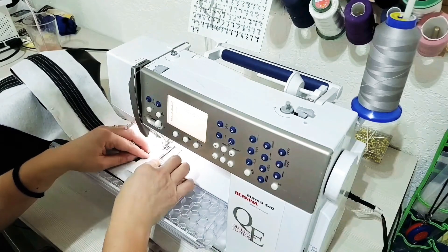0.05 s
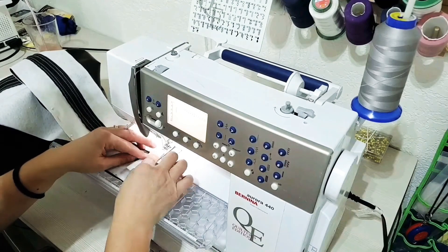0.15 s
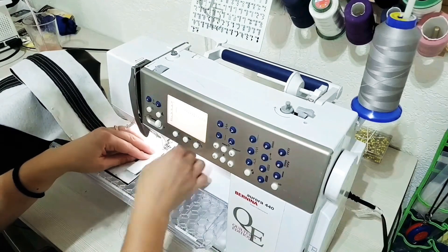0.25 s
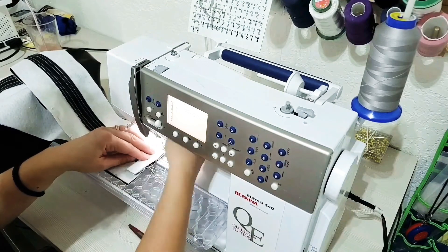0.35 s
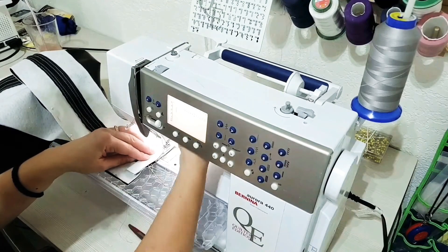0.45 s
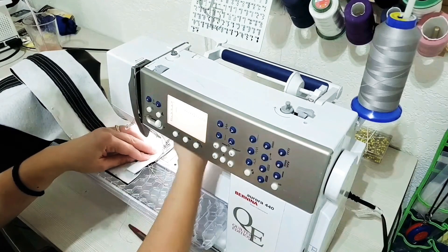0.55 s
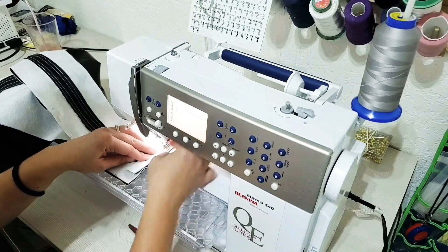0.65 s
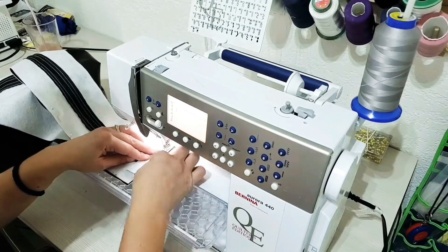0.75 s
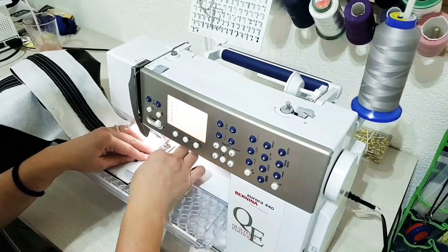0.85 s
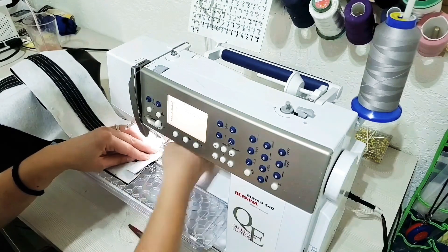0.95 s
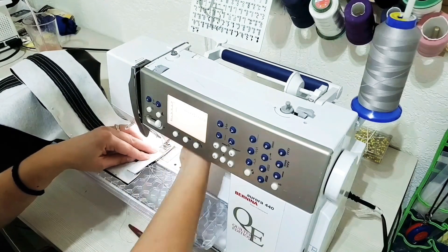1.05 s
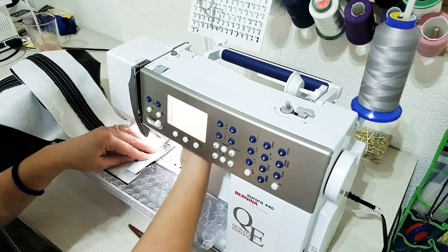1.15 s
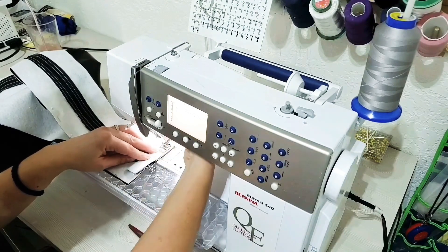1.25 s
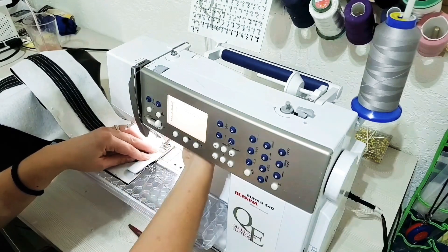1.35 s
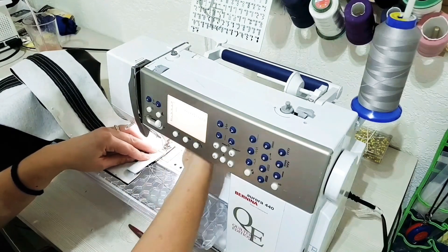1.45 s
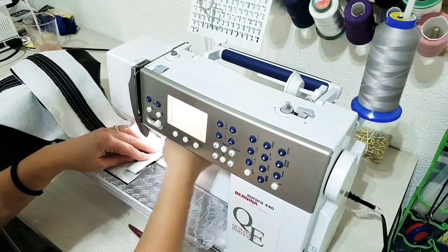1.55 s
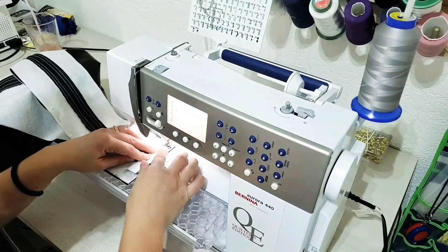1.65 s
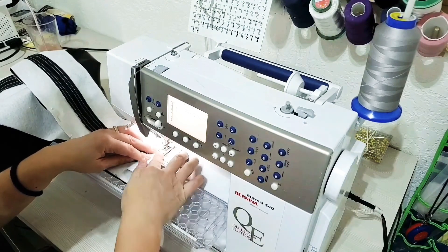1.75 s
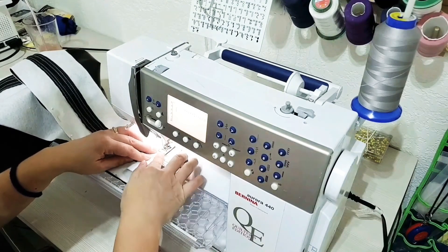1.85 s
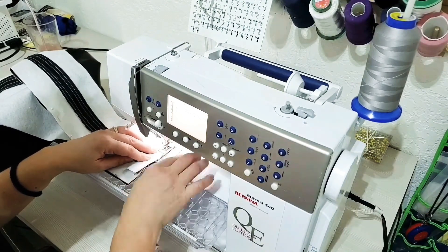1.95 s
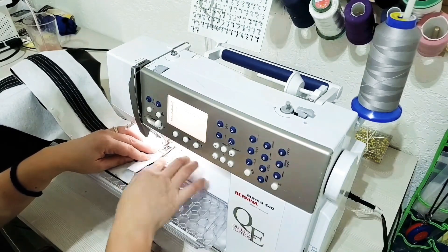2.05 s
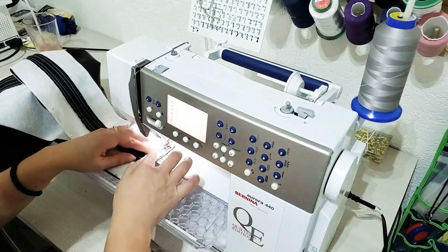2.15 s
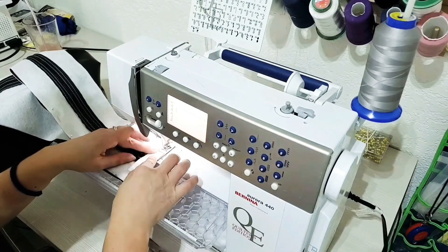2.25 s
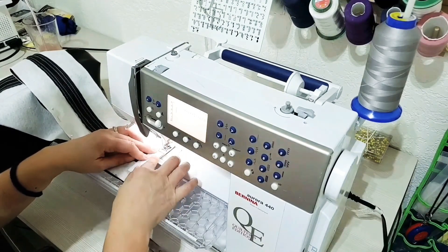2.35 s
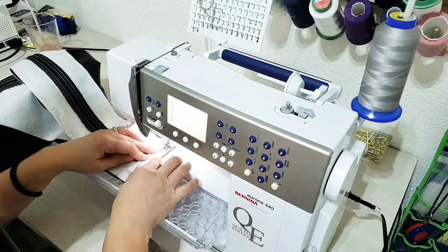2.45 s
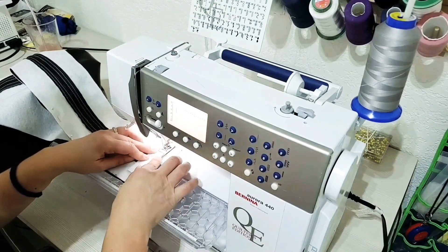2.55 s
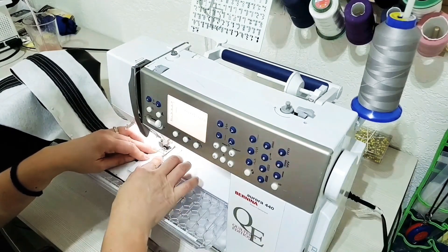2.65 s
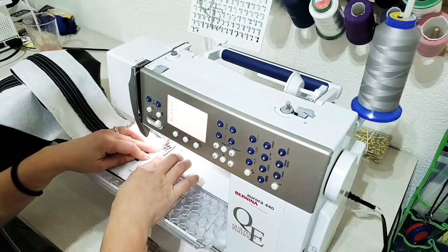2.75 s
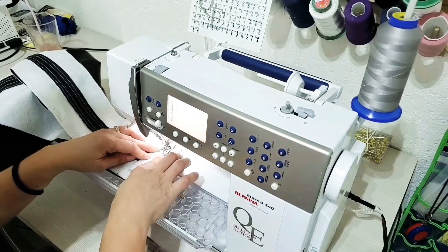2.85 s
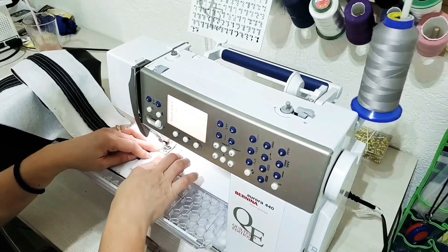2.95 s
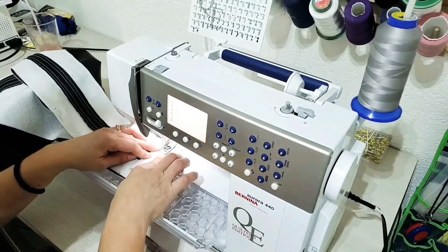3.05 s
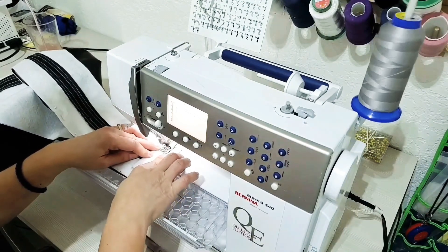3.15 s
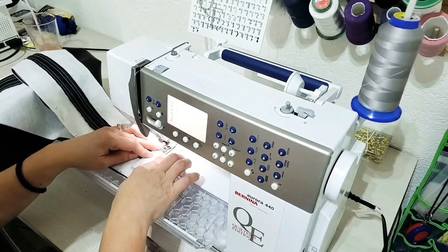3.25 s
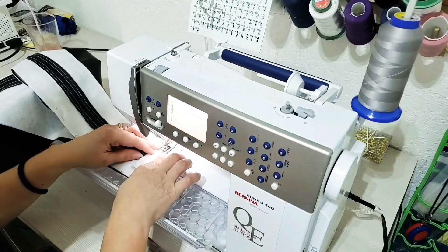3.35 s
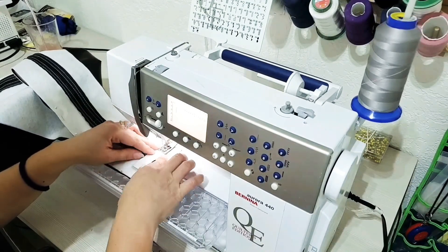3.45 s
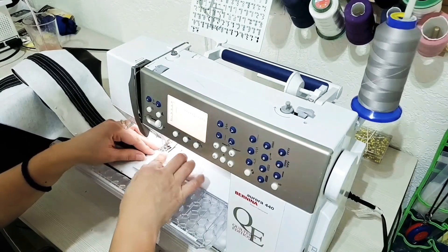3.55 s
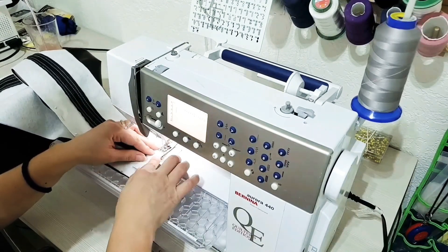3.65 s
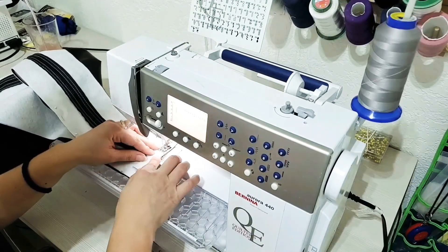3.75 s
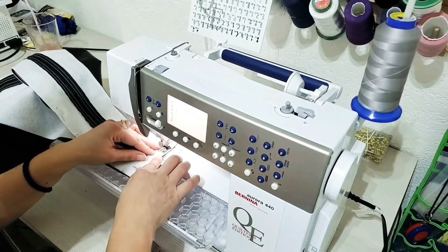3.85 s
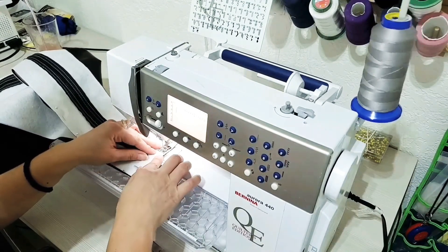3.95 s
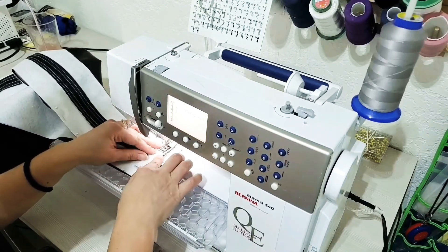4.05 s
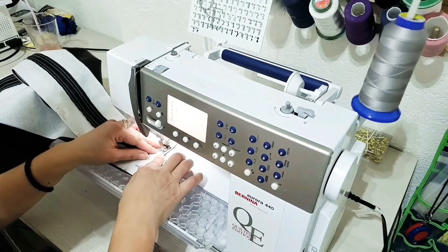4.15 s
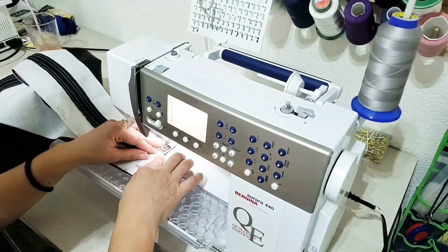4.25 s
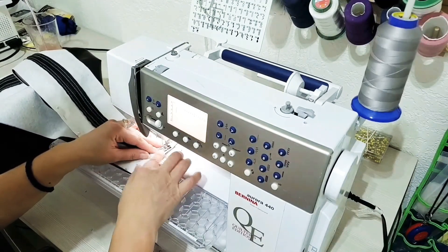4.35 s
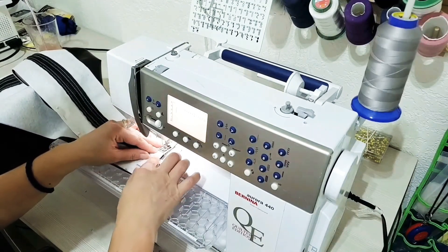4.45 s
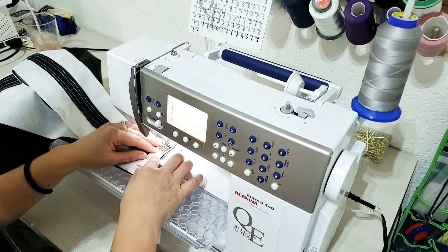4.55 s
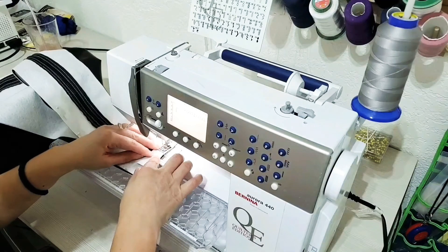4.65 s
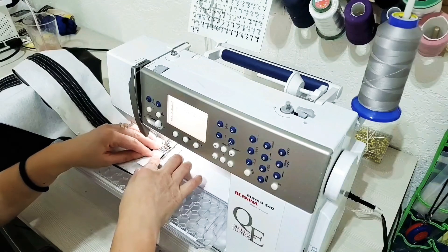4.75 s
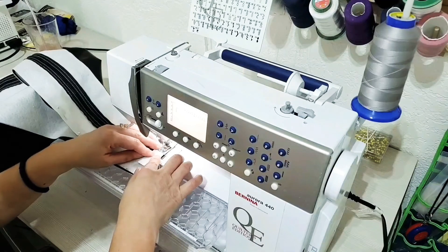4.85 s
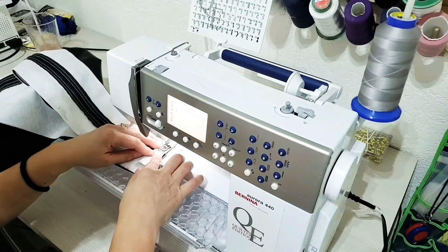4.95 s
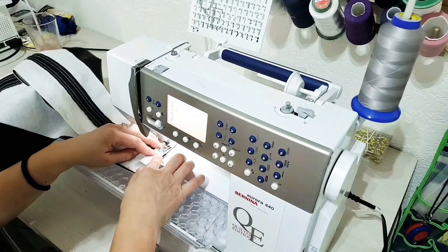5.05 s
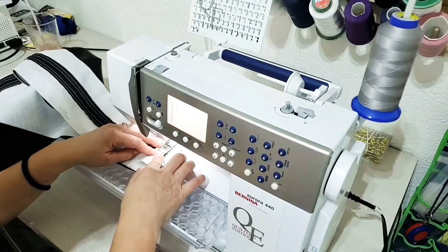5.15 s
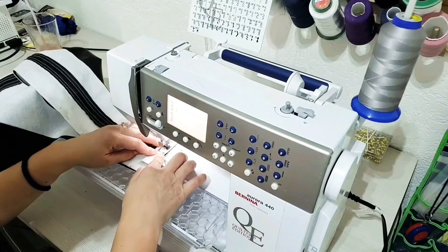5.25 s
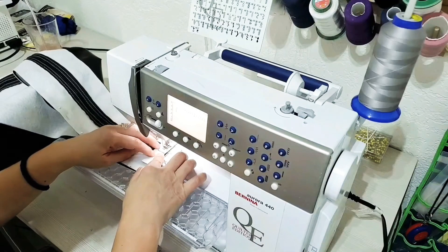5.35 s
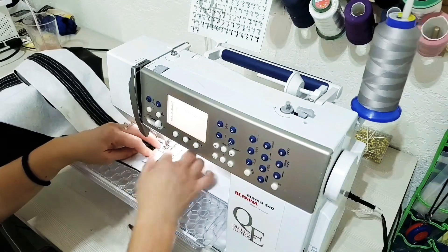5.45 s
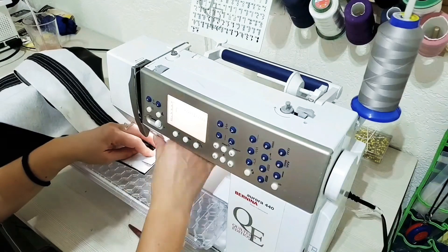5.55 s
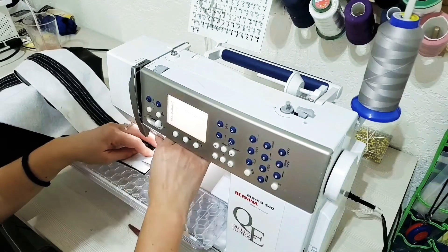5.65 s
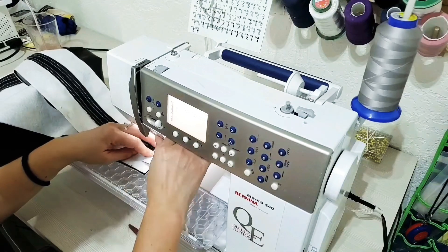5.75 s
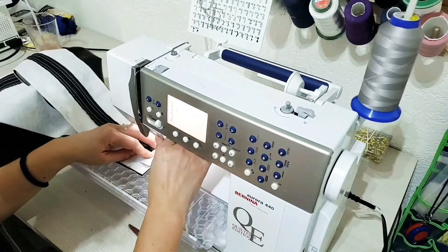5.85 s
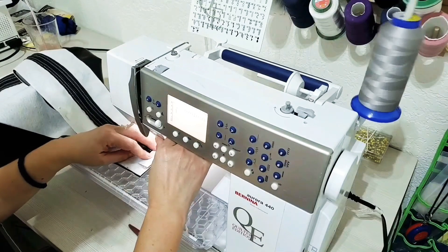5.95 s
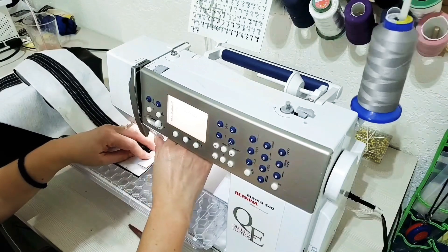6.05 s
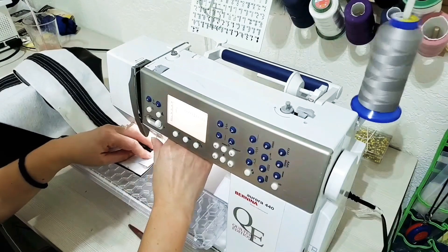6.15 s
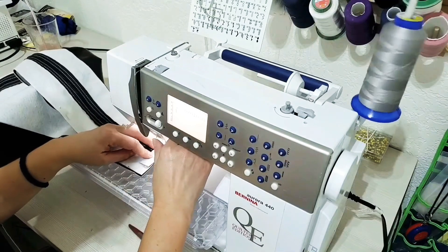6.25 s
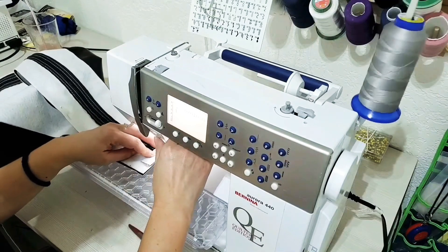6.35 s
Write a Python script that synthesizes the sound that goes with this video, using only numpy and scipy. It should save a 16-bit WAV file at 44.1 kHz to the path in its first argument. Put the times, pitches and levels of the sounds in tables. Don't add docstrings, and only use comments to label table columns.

```python
import sys
import numpy as np
from scipy import signal
from scipy.fft import rfft, irfft, next_fast_len
from scipy.io import wavfile
from scipy.ndimage import uniform_filter1d

SR = 44100
rng = np.random.default_rng(int(sys.argv[2]) if len(sys.argv) > 2 else 0)


def boost(x):
    u = np.asarray(x, float) / 20
    return 10 ** u


def dump(signal):
    limited = np.clip(np.atleast_2d(signal).T, -1, 1)
    pcm = np.round(limited * 32767).astype(np.int16)
    wavfile.write(sys.argv[1], SR, pcm)


N = 282007
M = next_fast_len(N + 8192)
T = np.arange(N) / SR
EDGE_HZ = 14750
SIDES = np.array([[0.5], [-0.5]])


def evened(x):
    return x / np.sqrt(np.mean(x ** 2) + 1e-20)


def wander(samples):
    smooth = uniform_filter1d(rng.standard_normal(N), samples)
    return evened(uniform_filter1d(smooth, samples))


def read(points, hz):
    f, value = np.transpose(points)
    return np.interp(np.log(hz + 1), np.log(f + 1), value)


def colour(points, peaks):
    hz = np.fft.rfftfreq(M, 1 / SR)
    level_db = read(points, hz) - np.clip((hz - EDGE_HZ) / 6, 0, 90)
    for centre_hz, width_hz, peak_db in peaks:
        level_db += peak_db / (1 + (2 * (hz - centre_hz) / width_hz) ** 2)
    return hz, boost(level_db)


def causal(gain):
    folded = irfft(np.log(gain + 1e-5), M)
    folded[1:M // 2] *= 2
    folded[M // 2 + 1:] = 0
    return np.exp(rfft(folded))


def swell(start_s, rise_s, t60_s):
    rise_s, t60_s = np.clip(rise_s, 0.0005, 0.06), np.clip(t60_s, 0.02, 0.5)
    u = np.arange(int(0.5 * SR)) / SR
    rise = np.sin(np.pi / 2 * np.minimum(u / rise_s, 1)) ** 2
    decay = boost(-60 * np.maximum(u - rise_s, 0) / t60_s)
    return round(start_s * SR), rise * decay


def add(mix, at, sound):
    part = mix[..., at:at + sound.shape[-1]]
    part += sound[..., :part.shape[-1]]


def motor_runs():
    # time_s, load_db
    loads = [
        [(2.42, -52), (2.53, -10.5), (2.575, -29), (2.63, -3.5), (2.72, -5.5), (2.93, -6), (3.14, -5.5),
         (3.29, -15.5), (3.37, -63)],
        [(3.64, -38), (3.754, -3.5), (3.866, 3), (4.052, -1.5), (4.222, -7), (4.32, -45)],
        [(4.67, -37.5), (4.71, -27), (4.79, -1.5), (4.9, -1.5), (5.0, -3.5), (5.24, -9.5), (5.37, -21),
         (5.45, -49)],
        [(5.55, -45), (5.65, -8.5), (5.7, 4), (5.85, 0), (5.92, 0), (6.16, 1), (6.236, 0), (6.27, 3.5),
         (6.39, -6)],
    ]
    # level_db at load 0, slope_db per dB of load, lag_s
    layers = [(-48.5, .6, -0.0047), (-40.5, 1.04, -0.003), (-47.5, 1.19, 0.01), (-54.5, 1.25, 0.024)]
    drive = np.zeros((4, N))
    for rows in loads:
        time_s, load_db = np.transpose(rows)
        on = (T > time_s[0]) & (T < time_s[-1])
        for k, (level_db, slope_db, lag_s) in enumerate(layers):
            drive[k] += on * boost(level_db + slope_db * np.interp(T - lag_s, time_s, load_db))
    return drive


def blows(table, parts_db, rises_s):
    soft_dull = 0.2
    drive = np.zeros((4, N))
    for start_s, level_db, hard_db, t60_s in table:
        echo = boost(-15) * swell(start_s, 0.02, 0.16)[1]
        for k, (part_db, rise_s) in enumerate(zip(parts_db, rises_s)):
            at, shape = swell(start_s - 0.6 * rise_s, rise_s, t60_s)
            gain_db = level_db + part_db + hard_db * (k - 1)
            if k == 2:
                gain_db += soft_dull * min(hard_db, 0)
            add(drive[k + 1], at, boost(gain_db) * (shape + echo))
    return drive


def lever_blows():
    # start_s, level_db, hardness_db per band, t60_s
    lever_hits = [
        (0.278, -61.5, -14.5, .1),
        (.29, -50, -6, 0.39),
        (0.314, -39.5, 3, 0.23),
        (0.384, -39.5, -4.5, 0.23),
        (1.164, -61, -9, 0.2),
        (1.341, -41, -0.5, 0.31),
        (1.36, -39.5, 4.5, 0.064),
        (1.32, -66, 0, .05),
        (1.447, -60, -12, 0.15),
        (1.48, -70, -8, .5),
    ]
    return blows(lever_hits, [-4.5, -8.5, -12.5], [0.01, 0.018, 0.003])


def fabric_shifts():
    # start_s, level_db, hardness_db per band, t60_s
    shifts = [
        (0.512, -65, -9, 0.3),
        (.774, -57.5, -8, .13),
        (.79, -53, -6, .16),
        (.81, -60, 4, .3),
    ]
    return blows(shifts, [-8, -9, -24], [0.013, 0.026, 0.015])


def stitch_blows():
    # start_s, level_db, hardness_db per band, t60_s
    stitch_hits = [(2.479, -80, -19, .3), (2.499, -52.5, -4, 0.1), (2.557, -41, -2, 0.59),
                   (2.645, -48, -6, .05), (2.745, -46, -5, .06), (3.082, -47, -7, .05), (3.231, -50, 5, .05),
                   (3.765, -50, -4, .08), (3.818, -50, 0, .06), (4.15, -58, 12, .5), (4.07, -50, 3, .08),
                   (2.674, -38, -2, 0.095), (2.794, -40, -3, 0.2), (2.844, -42.5, 5, 0.21),
                   (2.895, -41, 12, 0.13), (2.964, -50, -4, 0.16), (3.032, -36.5, 5, 0.05),
                   (3.102, -40.5, -1.5, 0.33), (3.188, -44.5, -4, 0.35), (3.247, -44.5, 0, 0.16),
                   (3.702, -68, -27.5, 0.17), (3.712, -60, 7, .36), (3.848, -43, 0, 0.076),
                   (3.898, -47.5, 14.5, 0.063), (3.948, -45, 14, 0.079), (3.985, -39, -1, 0.043),
                   (4.128, -39.5, -13.5, 0.092), (4.215, -60, -3, .1), (4.34, -78, 14, 0.61),
                   (4.708, -63, -19.5, 0.3), (4.735, -60, -2, 0.3), (4.775, -50, -8, .1),
                 (4.79, -45.5, 13, 0.12), (4.816, -36, 1, 0.065), (4.875, -36, 0.5, 0.083),
                 (4.947, -50, -2, .04), (5.282, -52, 8, .05), (5.3, -45, -3, .05), (5.822, -41, 3, .06),
                 (5.985, -43, 6, .05), (6.066, -44, 0, .06), (6.1, -44, 8, .06), (6.166, -48, 8, .04),
                 (6.247, -54, 9, .06), (6.382, -48, 2, .05), (5.73, -45, 0, .05), (5.63, -58, 8, .05),
                 (5.016, -40.5, -2.5, 0.2), (5.071, -40, -7.5, 0.18), (5.134, -47, 10.5, 0.15),
                 (5.248, -43.5, -7, 0.75), (5.319, -33.5, 2.5, 0.12), (5.592, -64.5, -15, 0.53),
                 (5.647, -46.5, -7.5, 0.041), (5.665, -35.5, 10, 0.12), (5.779, -43, -3, 0.029),
                 (5.862, -44, 3, .05), (5.949, -45, -3, 0.034), (6.011, -35, -5, 0.27),
                 (6.132, -40.5, 2, 0.03), (6.183, -49, 8, 0.049), (6.224, -46, 2, 0.033),
                 (6.314, -43, 5, 0.024), (6.348, -49.5, -17.5, 0.39)]
    return blows(stitch_hits, [-6, -7, -11], [0.031, 0.028, 0.005])


def machine():
    # freq_hz, level_db per Hz
    casing = [(18, -64), (30, 0.5), (117, 3.5), (182, -7.5), (410, -12.5), (1230, -11), (1470, -14.5),
              (1870, -17.5), (2020, -15.5), (2830, -10), (5890, -19), (10700, -17.5), (14000, -19.5),
              (15500, -46)]
    # centre_hz, width_hz, peak_db over the casing colour
    modes = [(87, 20, -2.5), (113.8, 51, 3), (307, 34, 7), (416, 25, 8), (520, 32, 5.5), (659, 230, 7),
             (960, 14, 4), (1180, 13, 4), (1287, 31, 5), (1660, 95, 4), (1864, 60, 11), (2135, 30, 5),
             (2840, 13, 7.5), (3400, 41, 4.5), (4015, 290, 4.5), (11000, 220, 4.5)]
    band_hz = [48, 250, 1500, 5500, 16000]
    drive = motor_runs() + lever_blows() + fabric_shifts() + stitch_blows()
    size = boost(1.47 * wander(120))
    contacts = evened(size * rng.standard_normal((2, N)))
    hz, gain = colour(casing, modes)
    phase = np.exp(1j * np.angle(causal(gain)))
    sound = 0
    for k in range(4):
        low_cut = 1 + (band_hz[k] / (hz + 1)) ** 8
        high_cut = 1 + (hz / band_hz[k + 1]) ** 8
        band = gain / np.sqrt(low_cut * high_cut)
        sound = sound + rfft(drive[k] * contacts, M) * evened(band) * phase
    alike = 1 / (1 + (hz / 750) ** 4)
    low = irfft(sound[0] * np.sqrt(alike), M)[:N]
    high = irfft(sound * np.sqrt(1 - alike), M)[:, :N]
    return low, high


def rings(table, wobble, rise, lag):
    out = np.zeros((2, N))
    for start_s, level_db, pitch_hz, t60_s in table:
        at, shape = swell(start_s, rise, t60_s)
        drift = evened(uniform_filter1d(rng.standard_normal(len(shape)), 300))
        turn = 2 * np.pi * np.cumsum(pitch_hz * (1 + wobble * drift)) / SR
        lean = boost(level_db + 0.3 * SIDES)
        add(out, at, lean * shape * np.sin(turn + lag * SIDES))
    return out


def panel_rings():
    # start_s, level_db, pitch_hz, t60_s
    struck = [(.283, -35, 520, .056), (.318, -30, 396, .064), (2.829, -31.5, 462.4, 0.25),
              (3.11, -19.5, 557, 0.07), (3.129, -30, 898, 0.1), (4.125, -27, 980, 0.16),
              (4.127, -16, 550, 0.075), (4.815, -31, 850, 0.19), (5.966, -27, 658, 0.091),
              (6.011, -12.5, 655, 0.11), (6.01, -26, 520, .05), (6.014, -23, 960, 0.078),
              (6.012, -23, 1100, .09)]
    # start_s, level_db, pitch_hz, t60_s
    held = [(.43, -43.5, 266.4, 0.38), (2.97, -37, 292.5, 0.13), (3.69, -38, 724, 0.088),
            (3.82, -40, 714, 0.13), (4.81, -40, 1097, 0.11), (6.25, -36, 604, .15),
            (2.495, -38.5, 410, .23), (2.575, -32, 420, 0.2), (2.855, -36, 486, 0.32),
            (3.155, -33.5, 646, 0.18), (3.21, -44, 307, 0.24), (4.79, -30, 664, 0.11),
            (4.95, -33.5, 416.6, 0.43), (4.96, -36, 653, 0.55), (5.08, -36, 222.3, 0.19),
            (5.178, -40, 310, .1), (5.21, -30, 311.5, .1), (3.84, -31, 485, .15), (3.7, -35, 410, .4),
            (2.6, -36, 500, .2), (5.76, -30, 300, .15), (5.77, -31, 700, .1), (5.91, -31, 640, .12),
            (5.095, -32, 530, .1), (2.545, -34, 700, .15), (5.375, -48.5, 720, .15),
            (5.305, -41.5, 674, 0.22)]
    # start_s, level_db, pitch_hz, t60_s
    take_up = [
        (2.452, -48, 523, .24),
        (2.476, -45, 525, 0.3),
        (3.665, -48, 520, 0.083),
        (3.68, -40, 510, 0.15),
        (5.568, -52, 537, .13),
        (5.585, -43, 536, 0.32),
    ]
    # start_s, level_db, pitch_hz, t60_s
    strokes = [
        (3.99, -35.0, 432.0, 0.14),
        (4.81, -33.0, 1259.0, 0.09),
        (6.099, -35.0, 303.0, 0.09),
        (6.128, -30.0, 1185.0, 0.06),
        (6.205, -34.0, 524.0, 0.14),
        (6.245, -39.0, 1222.0, 0.19),
    ]
    return (boost(-3.2) * rings(struck, wobble=0.018, rise=0.008, lag=-0.45)
            + boost(-3.0) * rings(held, wobble=0.018, rise=0.023, lag=0.7)
            + rings(take_up, wobble=0.045, rise=0.022, lag=-1.0)
            + rings(strokes, wobble=0.025, rise=0.016, lag=0.3))


def far_and_side_rings():
    # start_s, level_db, pitch_hz, t60_s
    opposed = [(0.382, -31.0, 285.0, 0.06), (2.636, -36.0, 680.0, 0.07), (2.769, -38.0, 413.0, 0.23),
               (2.887, -36.0, 662.0, 0.08), (2.932, -32.0, 423.0, 0.24), (2.986, -35.0, 404.0, 0.08),
               (3.125, -37.0, 331.0, 0.09), (3.785, -32.0, 698.0, 0.11), (3.835, -34.0, 1121.0, 0.08),
               (3.965, -36.0, 1204.0, 0.15), (3.973, -34.0, 266.0, 0.22), (4.781, -33.0, 303.0, 0.08),
               (4.829, -36.0, 496.0, 0.09), (4.875, -36.0, 1102.0, 0.13), (5.003, -37.0, 1323.0, 0.09),
               (5.09, -37.0, 919.0, 0.07), (5.676, -33.0, 514.0, 0.11), (5.682, -33.0, 662.0, 0.12),
               (5.926, -33.0, 1277.0, 0.15), (5.945, -36.0, 1112.0, 0.15), (6.007, -30.0, 1259.0, 0.07),
               (6.007, -30.0, 1589.0, 0.09), (6.244, -35.0, 413.0, 0.11), (6.287, -38.0, 230.0, 0.1),
               (6.299, -34.0, 478.0, 0.16)]
    # start_s, level_db, pitch_hz, t60_s
    sideways = [(2.659, -33.0, 478.0, 0.27), (3.189, -34.0, 312.0, 0.22), (3.864, -36.0, 845.0, 0.1),
                (3.928, -36.0, 606.0, 0.08), (4.898, -36.0, 230.0, 0.2), (5.713, -33.0, 1093.0, 0.08),
                (6.126, -37.0, 1599.0, 0.07), (6.128, -32.0, 910.0, 0.06), (6.264, -35.0, 974.0, 0.09),
                (6.341, -33.0, 413.0, 0.08)]
    # start_s, level_db, pitch_hz, t60_s
    far_heavy = [(5.076, -20, 533, .08), (6.153, -30, 225, .25), (5.74, -31, 110, .15),
                 (2.672, -36, 275, .5), (2.9, -37, 130, .12), (4.813, -36, 110, .12), (.42, -38, 120, .2),
                 (2.815, -34, 500, .1), (5.375, -42, 520, .25)]
    # start_s, level_db, pitch_hz, t60_s
    side_heavy = [
        (6.135, -30, 1060, 0.086),
        (6.133, -22.5, 677, 0.11),
        (6.35, -27, 910, 0.21),
        (6.349, -28, 550, 0.14),
        (6.012, -24, 400, .08),
    ]
    return (rings(opposed, wobble=0.025, rise=0.016, lag=3.0)
            + rings(sideways, wobble=0.025, rise=0.016, lag=-1.5)
            + rings(far_heavy, wobble=0.01, rise=0.012, lag=3.1)
            + rings(side_heavy, wobble=0.018, rise=0.008, lag=-1.6))


def steel_rings():
    # start_s, level_db, pitch_hz, t60_s
    pings = [(.284, -25.5, 2000, 0.019), (.786, -36, 1990, 0.071), (.787, -35, 737, 0.089),
             (.311, -27.5, 3420, 0.22), (.382, -20.5, 1386, 0.051), (1.161, -34.5, 880, 0.044),
             (1.162, -50, 1900, 0.033), (1.355, -24, 3420, 0.13), (3.032, -26, 2920, 0.07),
             (.383, -28, 850, .07)]
    # start_s, level_db, pitch_hz, t60_s
    clinks = [(0.385, -42, 1911, 0.08), (2.739, -46, 2830, 0.07), (2.745, -44, 1874, 0.06),
              (2.798, -42, 1838, 0.05), (3.028, -44, 3546, 0.05), (3.184, -47, 3969, 0.05),
              (3.187, -45, 2370, 0.05), (3.25, -42, 1819, 0.05), (3.846, -40, 2426, 0.05),
              (3.895, -43, 3602, 0.05), (3.959, -43, 3693, 0.05), (3.987, -40, 1856, 0.09),
              (3.988, -41, 3363, 0.05), (5.007, -43, 1617, 0.07), (5.01, -43, 4024, 0.05),
              (5.316, -38, 2756, 0.05), (5.728, -43, 3785, 0.08), (5.757, -42, 2334, 0.05),
              (5.817, -42, 3969, 0.06), (5.818, -41, 2352, 0.05), (5.824, -41, 3363, 0.05),
              (5.856, -44, 3546, 0.06), (5.859, -41, 3951, 0.05), (5.939, -44, 2775, 0.09),
              (5.981, -46, 4906, 0.05), (6.014, -30, 1617, 0.09), (6.059, -41, 2517, 0.05),
              (6.181, -42, 2517, 0.05), (6.183, -44, 2187, 0.08), (6.381, -47, 3638, 0.05)]
    return (boost(-12.0) * rings(pings, wobble=0.018, rise=0.00077, lag=1.2)
            + rings(clinks, wobble=0.03, rise=0.008, lag=-1.4))


def ticks():
    # start_s, level_db, centre_hz
    tick_hits = [(0.3187, -30, 6400), (1.343, -34.5, 5900), (2.562, -36, 7770), (2.8963, -24, 9000),
                 (2.9631, -28.5, 6020), (3.03, -31, 9500), (3.1026, -30, 10000), (3.9469, -26, 11000),
                 (3.8994, -33, 10500), (5.654, -36, 10000), (4.818, -34, 8000), (4.788, -22, 11000),
                 (5.3233, -51, 6180), (5.6115, -49, 11000), (5.666, -20, 9600), (5.867, -19.5, 10600),
                 (6.0212, -25, 5670), (6.2263, -22.5, 11000), (6.3155, -33, 11660)]
    out = np.zeros((2, N))
    f = np.fft.rfftfreq(4096, 1 / SR)
    for start_s, level_db, centre_hz in tick_hits:
        at, shape = swell(start_s - 0.001, 0.0015, 0.025)
        burst = shape[:4096] * rng.standard_normal((2, 4096))
        bright = 0.36 + 1 / (1 + (4 * (f - centre_hz) / 5000) ** 2)
        bright = bright / (1 + (6000 / (f + 1)) ** 8) / (1 + (f / 14600) ** 90)
        add(out, at, boost(level_db - 8.5) * irfft(rfft(burst) * evened(bright)))
    return out


def whine():
    # time_s, pitch_hz, level_db
    climbs = [
        [(5.8, 90, -56), (5.858, 113, -41), (5.97, 152, -36), (6.02, 185, -46), (6.052, 222, -31),
         (6.085, 260, -39), (6.112, 293, -37), (6.135, 312, -50)],
        [(6.13, 205, -50), (6.142, 210, -35), (6.197, 243, -44), (6.235, 285, -35), (6.28, 320, -52)],
    ]
    out = np.zeros((2, N))
    slip, flutter = wander(500), wander(500)
    for rows in climbs:
        time_s, pitch_hz, level_db = np.transpose(rows)
        turn = 2 * np.pi * np.cumsum(np.interp(T, time_s, pitch_hz) * (1 + 0.025 * slip)) / SR
        loudness = boost(np.interp(T, time_s, level_db, -99, -99) + 1.5 * flutter)
        out += loudness * np.sin(turn + 0.6 * SIDES)
    return out


def table_rings():
    # start_s, level_db, pitch_hz, t60_s
    knocks = [(.04, -48.5, 50.5, 0.22), (.304, -32, 307, 0.23), (.39, -23, 100, 0.061),
              (1.354, -28.5, 85.4, 0.12), (1.456, -43, 110, 0.12), (2.503, -43, 258, 0.25),
              (2.607, -32.5, 123.4, 0.17), (2.772, -33.5, 128.3, 0.43), (3.147, -37.5, 112.7, 0.27),
              (3.718, -39.5, 105, .18), (4.119, -32, 346, 0.13), (4.761, -33.5, 83, 0.14),
              (5.0, -41, 110, .15), (6.034, -34, 228, .1), (6.138, -36, 225, 0.1), (6.275, -36, 115, .1),
              (3.93, -36, 125, .25)]
    # start_s, level_db, pitch_hz, t60_s
    thumps = [(.29, -35, 78.1, 0.19), (.551, -51, 60.5, .48), (.784, -49, 62.7, 0.53),
              (1.151, -54, 124.4, .48), (1.723, -51, 119, 0.25), (1.995, -50, 117, 0.18),
              (2.047, -47, 59.5, 0.16), (3.072, -45, 77, .2), (3.757, -39, 99.6, 0.12),
              (4.12, -38.5, 105, 0.1), (4.829, -37, 53.8, 0.14), (5.25, -40.5, 83, 0.19),
              (5.679, -52, 138, 0.12), (5.739, -55, 72.7, 0.18), (6.092, -34, 84.6, 0.11)]
    return (rings(knocks, wobble=0.049, rise=0.0088, lag=1.0)
            + rings(thumps, wobble=0.029, rise=0.011, lag=1.3))


def room():
    # freq_hz, level_db per Hz
    air_colour = [(12, -58), (20, -20), (49, -12.5), (119, -18), (207, -24.5), (266, -12.5), (306, -28.5),
                  (362, -13.5), (614, -16.5), (1100, -25), (2270, -36), (3080, -34), (11100, -50.5),
                  (13900, -35.5), (15500, -69.5)]
    # centre_hz, width_hz, peak_db
    hum_peaks = [(57, 8.7, 14.5), (125.2, 41, 13.5), (278.4, 8.8, 11.5), (341.5, 42, 2.5), (1284, 260, 11),
                 (9370, 1400, 15), (11000, 1700, 15.5)]
    # time_s, hum_db
    hum_curve = [
        [(0.0, -59.5), (0.33, -61), (0.44, -53.5), (0.98, -58), (1.28, -60.5), (2.35, -59.5), (2.45, -60.5)],
    ]
    hz, gain = colour(air_colour, hum_peaks)
    low = gain / (1 + (hz / 450) ** 4)
    noise = rfft(rng.standard_normal((2, M)))
    hum_db = np.interp(T, *np.transpose(hum_curve[0])) + 0.75 * wander(1500)
    hum = boost(hum_db) * irfft(noise[0] * evened(low), M)[:N]
    hiss = boost(-69) * irfft(noise * evened(gain - low), M)[:, :N]
    return hum, hiss


def drifted(low, high):
    # freq_hz, left_minus_right_db
    balance = [(60, -2.5), (180, 0.5), (550, 0.5), (1650, 0.5), (4970, 0.0), (15000, 0)]
    hz, t, bass = signal.stft(low, SR, nperseg=512, noverlap=384)
    treble = signal.stft(high, SR, nperseg=512, noverlap=384)[2]
    patches = rng.standard_normal((2, len(hz), len(t)))
    for axis, size in ((1, 3), (1, 2), (2, 30), (2, 20)):
        patches = uniform_filter1d(patches, size, axis)
    phase_patch, level_patch = evened(patches)
    turn = 2.85 * (1 + hz / 700)[:, None] * phase_patch * SIDES[..., None]
    z = boost(3.0) * bass * np.exp(1j * turn) + treble * boost(2.0 * level_patch)
    drops_hz = np.repeat(rng.exponential(350, len(t) // 8 + 1), 8)[:len(t)]
    z = z * (hz[:, None] < EDGE_HZ - drops_hz)
    lean = boost(read(balance, hz) * SIDES)[..., None]
    return signal.istft(z * lean, SR, nperseg=512, noverlap=384)[1][:, :N]


def scene():
    low, high = machine()
    hum, hiss = room()
    noisy = boost(1.5) * drifted(low + hum, high + hiss) + ticks()
    ringing = panel_rings() + far_and_side_rings() + steel_rings() + table_rings()
    return noisy + ringing + whine()


def low_pass(x):
    return signal.sosfilt(signal.butter(12, 15820, fs=SR, output="sos"), x)


def record(dry):
    bass_cut = signal.butter(2, 38, "high", fs=SR, output="sos")
    return low_pass(signal.sosfilt(bass_cut, dry))


dry = scene()
out = record(dry)
dump(out)
```